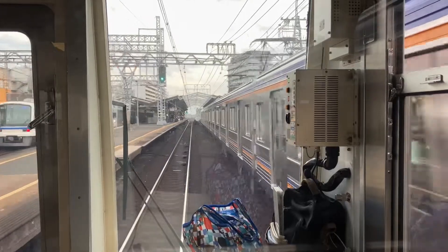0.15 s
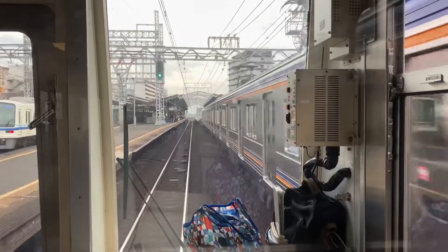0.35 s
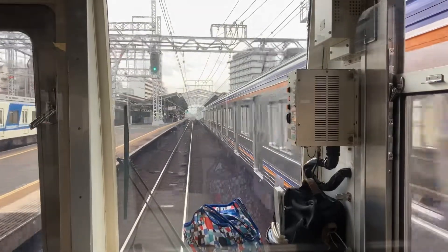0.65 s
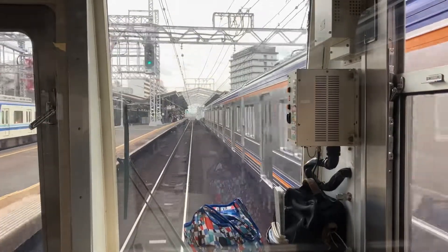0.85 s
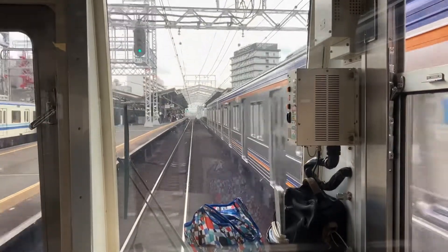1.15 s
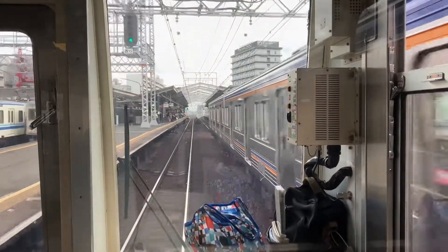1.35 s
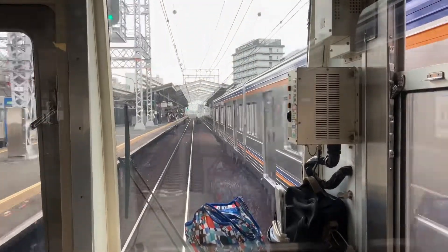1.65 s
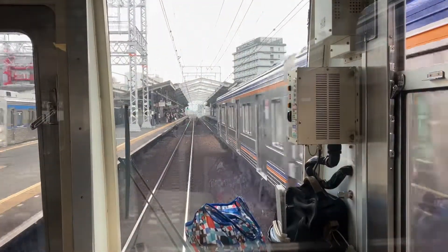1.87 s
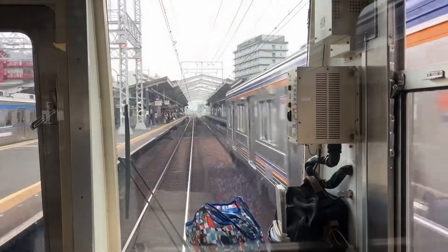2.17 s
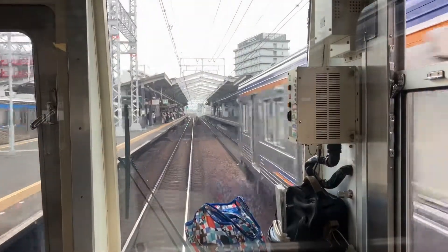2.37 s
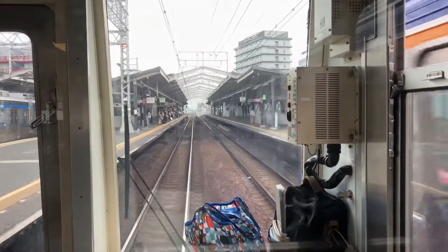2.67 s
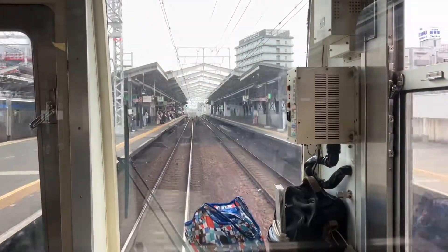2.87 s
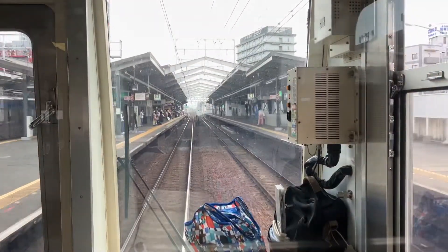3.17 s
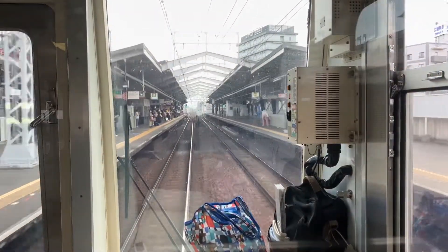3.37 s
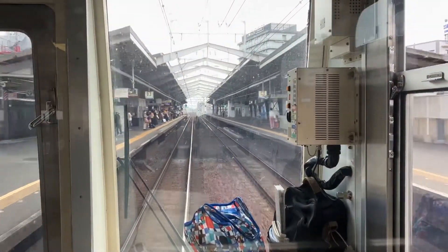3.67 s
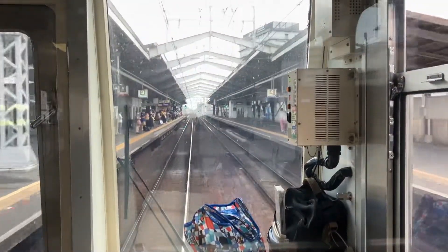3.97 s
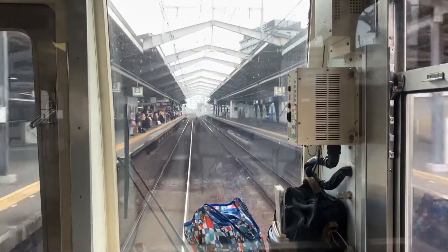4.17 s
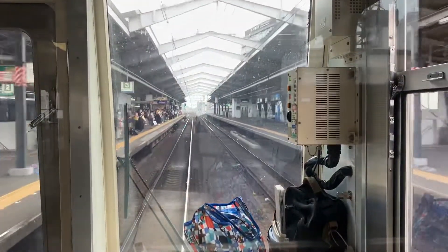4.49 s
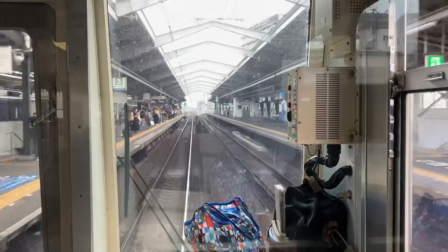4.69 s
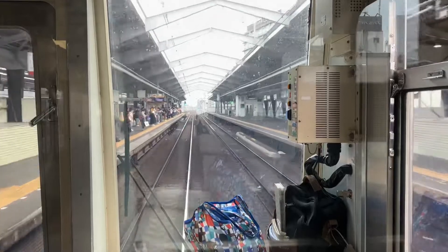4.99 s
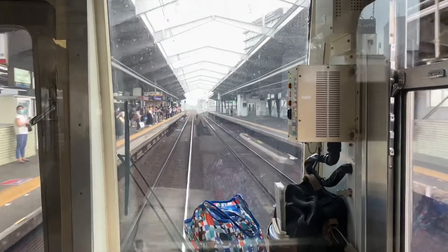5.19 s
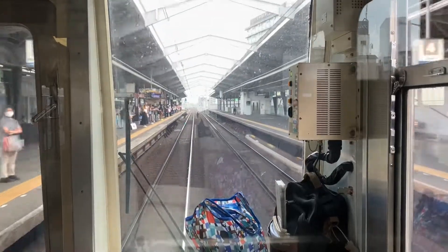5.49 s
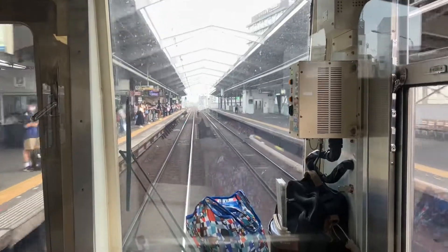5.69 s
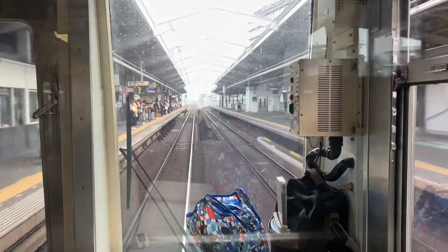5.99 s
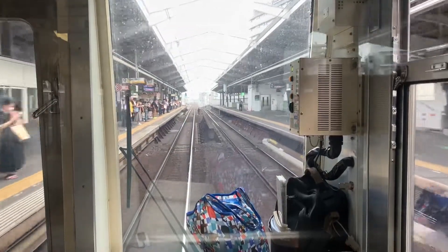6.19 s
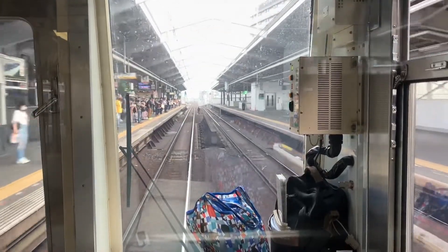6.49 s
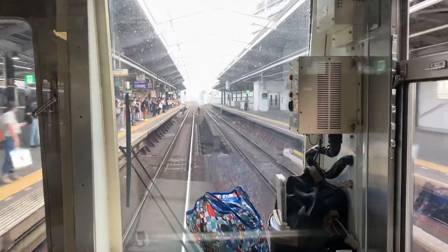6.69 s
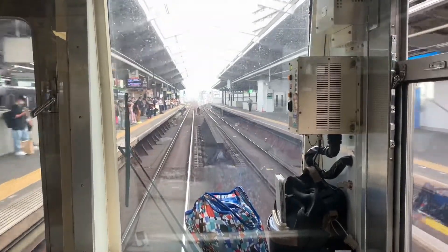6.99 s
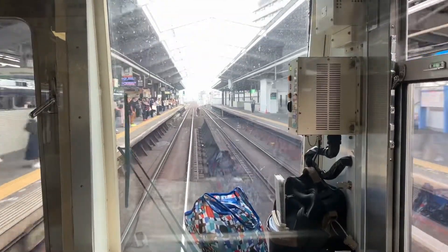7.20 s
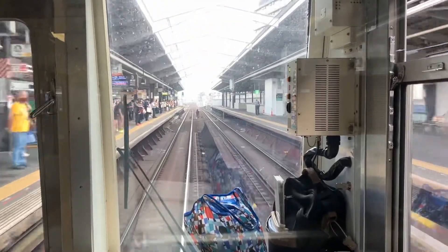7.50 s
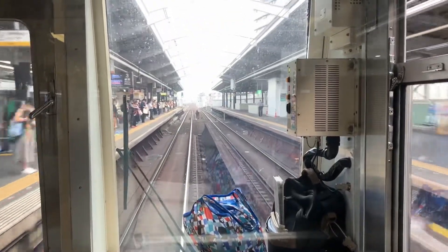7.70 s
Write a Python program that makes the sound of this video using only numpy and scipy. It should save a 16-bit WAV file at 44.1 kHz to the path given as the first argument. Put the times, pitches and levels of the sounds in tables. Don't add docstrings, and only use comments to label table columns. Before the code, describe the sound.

A phone inside a train car picks up boomy floor rumble, low throbbing hum and broad rolling noise as the train coasts into a station. Short metallic rings and soft air puffs flicker through it. A wavering whine goes by, a few light bumps follow, then after a calmer middle the wheels hammer across rail gaps, loose fittings clattering, with thin high squeal from the flanges.

```python
import sys
import numpy as np
from scipy import signal
from scipy.fft import rfft, irfft, next_fast_len
from scipy.io import wavfile
from scipy.ndimage import uniform_filter1d

SR = 44100
rng = np.random.default_rng(int(sys.argv[2]) if len(sys.argv) > 2 else 0)


def persist_wave(psi):
    counts = np.round(np.clip(psi, -1, 1) * 32767).astype(np.int16)
    wavfile.write(sys.argv[1], SR, np.atleast_2d(counts).T)


def rack_gain(trim_db):
    fader = np.asarray(trim_db, float)
    return 10 ** (fader / 20)


N = 346185
SIZE = next_fast_len(N, True)
T = np.arange(N) / SR
HZ = np.maximum(np.fft.rfftfreq(SIZE, 1 / SR), 1)

# pitch_hz, level_db (per Hz)
CAR_COLOUR = [(14, -42), (25, -22), (64, -3.5), (95, -4), (140, -13), (300, -18.5), (770, -30.5),
              (1300, -37), (3000, -45), (5500, -52.5), (8000, -62), (10500, -58), (13500, -68.5),
              (16000, -75)]
# pitch_hz, width_hz, level_db
PANEL_RINGS = [(80, 72, -1), (180, 24, 2), (240, 26, 3.5), (368, 14, 3), (516, 124, 5), (660, 50, -5),
               (776, 52, 7.5), (922, 77, 6.5), (2430, 79, 3.5), (1484, 52, 6), (1821, 130, 5),
               (3230, 120, 5.5), (6650, 740, 3), (7870, 870, 10.5), (15350, 600, 7)]


def level(x, db):
    return x * rack_gain(db) / np.sqrt(np.mean(x ** 2))


def along(table):
    hz, value = np.transpose(table)
    return np.interp(np.log(HZ), np.log(hz), value)


def played(table, fade=.04):
    s, *columns = np.transpose(table)
    gate = np.clip(np.minimum(T - s[0], s[-1] - T) / fade + .5, 0, 1)
    return *(np.interp(T, s, c) for c in columns), gate


def walk(rate):
    k = int(SR / rate)
    held = np.repeat(rng.standard_normal(N // k + 1), k)
    return 1.27 * uniform_filter1d(uniform_filter1d(held, k), k)[:N]


def resonance(hz, centre_hz, width_hz):
    return 1 / (1 + (2 * (hz - centre_hz) / width_hz) ** 2)


def narrow(hz, width_hz, steady=0):
    sos = signal.butter(2, width_hz / 2, fs=SR, output="sos")
    noise = rng.standard_normal((2, len(hz))) + 1j * rng.standard_normal((2, len(hz)))
    pair = signal.sosfilt(sos, noise)
    carrier = np.exp(2j * np.pi * np.cumsum(hz) / SR)
    return level(np.real(pair / abs(pair) ** steady * carrier), 0)


def ports(pair):
    # pitch_hz, likeness (0-1)
    likeness = [(25, .998), (60, .995), (125, .955), (250, .72), (500, .47), (1000, .2), (1300, .18),
                (3000, .1), (4300, .22), (6000, .25), (6900, .82), (8300, .96), (15000, .93)]
    # pitch_hz, lead (radians)
    port_lead = [(0, .1), (800, .1), (1300, 3.1), (1900, 2.1), (3500, 2.2), (4200, 6.2), (4700, 6.3),
                 (5300, 8.8), (5900, 9.9), (6500, 12.7), (6950, 12.57), (16500, -1.3)]
    # pitch_hz, difference_db
    port_lean = [(25, -1.3), (60, -3), (110, -1), (200, -2.5), (380, 1.5), (700, 1), (1290, 0), (2380, 1.5),
                 (4400, 0.5), (8120, -1), (15000, 1)]
    near, other = rfft(pair, SIZE)
    like = np.clip(along(likeness), 0, 1)
    turn = np.exp(-1j * np.interp(HZ, *np.transpose(port_lead)))
    lean = rack_gain(along(port_lean) / 2)
    left = near * lean
    right = (like * turn * near + np.sqrt(1 - like ** 2) * other) / lean
    return irfft([left, right], SIZE)[:, :N]


def hum():
    # time_s, level_db
    load = [(0, -27), (.9, -38), (1.2, -17.5), (1.45, -25.5), (2.0, -18.5), (2.4, -24.5), (2.9, -18.5),
            (3.4, -17.5), (3.9, -13), (4.13, -12), (4.55, -17), (4.78, -15), (5.3, -16.5), (5.9, -14.5),
            (6.62, -18.5), (6.87, -12.5), (7.17, -20.5), (7.85, -16)]
    # multiple of the pitch, level_db
    overtones = [(2, -38.5), (3, -39)]
    # time_s, depth_db
    lurches = [(1.265, 12), (1.57, 29), (1.86, 13), (3.29, 0), (3.535, 20), (3.785, 24), (3.96, 6),
               (4.18, 5), (4.31, 4), (4.58, 2), (4.73, 0.5), (4.91, 18), (5.21, 8), (5.87, 5), (6.15, 10),
               (6.245, 8), (6.5, 0.5), (6.74, 6), (7.75, 9)]
    hum_hz, lurch_s = 87.18, .026
    choke = sum(depth * np.exp(-((T - s) / lurch_s) ** 2) for s, depth in lurches)
    db = played(load)[0] + 1.0 * walk(14) - choke
    phase = 2 * np.pi * np.cumsum(hum_hz + 0.79 * walk(9)) / SR
    wander = np.cumsum(walk(30)) * 18 / SR
    tone = rack_gain(db - 0.5 + 0.62 * walk(20)) * np.sin(phase)
    for multiple, over_db in overtones:
        tone = tone + rack_gain(over_db + 2.1 * walk(8.6)) * np.sin(multiple * (phase + wander))
    return np.sqrt(2) * rack_gain([[-.8], [.8]]) * tone


def rolling():
    # time_s, level_db
    roughness = [(0, 0.5), (.5, 0), (1.3, -0.5), (1.95, 1.5), (2.25, -1), (2.6, 0), (3.25, -1), (3.7, 0),
                 (4.2, -1), (4.5, -0.5), (5.1, -2), (5.25, -3), (5.38, -2.5), (5.5, 2), (6.1, 1),
                 (6.45, -1), (6.8, -1.5), (7.6, -0.5), (7.85, -1)]
    layer_hz = [70, 260, 1200, 5500]
    layer_shares = [0.27, 1.28, 0.65, 0.29]
    # time_s, length_s, rise_db
    puffs = [
        (0.148, 0.33, 0),
        (.47, .15, 0.5),
        (1.152, 0.4, 1.5),
        (2.003, 0.11, 3),
        (2.33, 0.25, 3.5),
        (3.75, 0.19, 2),
        (4.27, .1, 2),
        (5.479, 0.056, 2.5),
        (7.098, 0.2, 2),
    ]
    top_calm = .35
    panel_db = sum(db * resonance(HZ, hz, width) for hz, width, db in PANEL_RINGS)
    colour = rack_gain(along(CAR_COLOUR) + panel_db)
    pair = colour * rfft(rng.standard_normal((2, SIZE)))
    rise = np.outer(layer_shares, played(roughness)[0]) + [db * walk(6) for db in (1.1, .6, .3, .2)]
    rise[3] += sum(db * np.exp(-(2 * (T - s) / length) ** 2) for s, length, db in puffs)
    out, place, shared = 0, 2 * np.log2(HZ / 20), walk(4.7)
    for k in range(20):
        share = np.interp(np.log(20 * 2 ** (k / 2)), np.log(layer_hz), range(4))
        weights = np.clip(1 - abs(share - np.arange(4)), 0, 1)
        shared = 0.93 * shared + 0.32 * walk(9)
        db = weights @ rise + 0.5 * shared + 1.0 * walk(22)
        db = db * (top_calm if k == 19 else 1)
        band = np.clip(1 - abs(place - k), 0, 1)
        out = out + rack_gain(db) * irfft(pair * band, SIZE)[:, :N]
    return level(out, -23)


def whistles():
    # start_s, length_s,
    # pitch_hz, width_hz, level_db
    short_rings = [(.055, .135, 1930, 30, -46.5), (.19, .06, 1810, 70, -47), (.265, .035, 1790, 60, -46),
                   (.195, .025, 2490, 60, -52), (.44, .07, 1800, 70, -50), (.57, .08, 1900, 160, -47),
                   (.66, .14, 1850, 160, -48), (1.02, .18, 1800, 160, -49), (1.78, .1, 1800, 120, -51),
                   (1.98, .1, 1800, 200, -50), (2.925, .095, 1840, 20, -46), (3.05, .06, 1790, 30, -48),
                   (3.15, .1, 1820, 30, -49), (3.19, .11, 2350, 600, -49), (3.07, .12, 635, 25, -37.5),
                   (3.74, .16, 243, 6, -27), (.98, .16, 190, 20, -31), (1.04, .1, 268, 15, -32),
                   (6.62, .12, 185, 20, -29), (7.08, .2, 270, 30, -33), (2.25, .24, 5900, 1800, -57),
                   (7.02, .12, 5900, 2000, -58),
                   (0, .6, 74, 5, -26), (.3, .7, 94, 6, -29), (6.9, .9, 120, 4, -34),
                   (1.84, .2, 112, 14, -25), (5.4, .35, 125, 40, -27), (7.3, .4, 195, 40, -29.5),
                   (5.03, .16, 180, 25, -31), (4.1, .12, 800, 80, -42), (5.425, .07, 830, 50, -39),
                   (3.24, .14, 300, 120, -34), (.02, .25, 140, 40, -31), (5.66, .07, 860, 150, -40),
                   (2.7, .35, 1900, 900, -52), (4.15, .17, 3200, 60, -59), (0, .35, 1950, 250, -52),
                   (.5, .32, 1870, 200, -53), (6.37, .07, 205, 15, -22), (5.8, .07, 280, 25, -26),
                   (3.8, .22, 3150, 100, -59), (2.3, .13, 6200, 500, -59), (3.18, .08, 1880, 120, -50),
                   (1.9, .16, 165, 30, -30), (6.36, .12, 195, 20, -26)]
    fan_hz, fan_db = 1128, -56
    out = rack_gain(fan_db) * narrow(np.full(N, 1. * fan_hz), 5.1)
    for s, length, hz, width_hz, db in short_rings:
        place = np.linspace(-1, 1, int(length * SR))
        settled = narrow(np.full(len(place) + SR // 5, 1. * hz), width_hz, steady=0.85)
        ring = settled[:, -len(place):]
        i = int(s * SR)
        out[:, i:i + len(place)] += level(ring * (1 - place ** 4), db)
    return out


def streaks():
    count, streak_db, mean_s = 120, -1, .07
    out = np.zeros((2, N + SR))
    centres, car = np.array(PANEL_RINGS)[4:12], np.array(CAR_COLOUR)
    for when, which, off, drift, long, turn in rng.random((count, 6)):
        centre_hz, _, panel_db = centres[int(which * len(centres))]
        hz = centre_hz * (.93 + .14 * off)
        t = T[:int(mean_s * (.5 + long) * SR)]
        glide = 1 + 0.26 * (drift - .6) * t
        phase = 2 * np.pi * (hz * t * glide + turn * np.array([[0], [1]]))
        car_db = np.interp(np.log(hz), np.log(car[:, 0]), car[:, 1])
        db = car_db - 14 + panel_db + streak_db
        i = int(when * N)
        out[:, i:i + len(t)] += rack_gain(db) * np.sin(phase) * np.sin(np.pi * t / t[-1])
    return out[:, :N]


def gaps():
    # time_s, peak_db, low_ring_hz, high_ring_hz, clank_db
    gap_hits = [(0.097, -27.5, 174, 255, -14), (1.786, -20, 167.1, 282, -21), (1.871, -21.5, 220, 295, -24),
                (1.991, -15.5, 168.5, 255, -20), (5.44, -7.5, 194.5, 275.3, -18.5),
                (5.612, -8, 205, 261.3, -18), (5.66, -18, 240, 260, -11), (5.806, -10.5, 169, 291, -18.5),
                (5.999, -12.5, 166, 267, -16), (6.164, -4, 228.5, 284.7, -23),
                (6.224, -17.5, 190, 300, -14), (6.352, -6, 190.3, 280.4, -23.5),
                (6.384, -9, 170.5, 283.4, -21), (6.625, -17, 191.6, 252, -21),
                (6.819, -15.5, 222, 261, -21), (7.685, -17.5, 180, 254, -21)]
    # pitch_hz, width_hz, level_db
    bogie_rumble = [(125, 40, -3), (235, 140, 0), (460, 200, -18)]
    # time_s, peak_db, pitch_hz
    fitting_ticks = [
        (3.2645, -28, 480),
        (6.178, -26, 700),
    ]
    high_ring_db = -0.5
    crack, crack_s = 0.62, 0.016
    out, t = np.zeros((2, 2, N + SR)), T[:8192]
    hz = np.maximum(np.fft.rfftfreq(len(t), 1 / SR), 1)
    bogie = sum(rack_gain(db) * resonance(hz, f, w) ** 2 for f, w, db in bogie_rumble)
    envelope = (1 - np.exp(-t / 0.0057)) * np.exp(-(t / 0.058) ** 2)
    for s, peak_db, low_hz, high_hz, clank_db in gap_hits:
        shake = rfft(rng.standard_normal((2, len(t))) + 1.3 * rng.standard_normal(len(t)))
        turn = rng.random() + 0.095 * rng.standard_normal((2, 2, 1))
        low_ring = np.sin(2 * np.pi * (low_hz * t + turn[0]))
        high_ring = np.sin(2 * np.pi * (high_hz * t + turn[1]))
        rings = low_ring + rack_gain(high_ring_db) * high_ring
        rumble = level(irfft(shake * bogie), -9.5)
        clank = level(irfft(shake * resonance(hz, 830, 240) ** 2), clank_db - 5.5)
        body = rack_gain(-8.5) * rings + rumble + clank
        grit_noise = rfft(rng.standard_normal((2, len(t))))
        grit = level(irfft(grit_noise * resonance(hz, 1800, 3800) ** 2), clank_db - 13.5)
        grit = grit * (1 + crack * np.exp(-t / crack_s))
        hit = np.array([body * rack_gain([[-.8], [.8]]), grit]) * envelope
        i = int(s * SR)
        out[..., i:i + len(t)] += rack_gain(peak_db) * hit
    for s, peak_db, tick_hz in fitting_ticks:
        tick = np.sin(2 * np.pi * tick_hz * t) + .03 * rng.standard_normal((2, len(t)))
        i = int(s * SR)
        out[1, :, i:i + len(t)] += rack_gain(peak_db - 3) * tick * np.exp(-t / .004)
    return out[..., :N]


def wiper():
    # length_s, ring_from_hz, ring_to_hz, level_db
    creaks = [
        (.165, 4200, 3200, -56.5),
        (.08, 3650, 3350, -61.5),
    ]
    first_s, sweep_s, stroke_s = .17, 2.122, .888
    chatter_hz = 291.5
    out, rough = np.zeros((2, N + SR)), rack_gain(3 * walk(60))
    for sweep in range(4):
        for k, (length, from_hz, to_hz, db) in enumerate(creaks):
            t = T[:int(length * SR)]
            hz = chatter_hz * (1 + 0.0011 * rng.standard_normal()) * np.arange(10, 16)[:, None]
            ring = to_hz + (from_hz - to_hz) * (1 - t / length) ** 1.9
            turn = rng.random((6, 1)) + .15 * rng.standard_normal((2, 6, 1))
            strength = resonance(hz, ring, 380) + .15 * resonance(hz, 3230, 200)
            lines = np.sin(2 * np.pi * (hz * t + turn)) * strength
            i = int((first_s + sweep * sweep_s + k * stroke_s - .048) * SR)
            swell = np.sqrt(np.sin(np.pi * t / length)) * rough[i:i + len(t)]
            creak = level(lines.sum(axis=1) * swell, db)
            out[:, i:i + len(t)] += creak * rack_gain([[1.5], [-1.5]])
    return out[:, :N]


def passing():
    # time_s, pitch_hz, level_db
    gear_whine = [(.6, 366, -46), (.7, 358, -32.5), (.76, 350, -33.5), (.82, 348.4, -26), (.93, 351.3, -36),
                  (.99, 360, -30.5), (1.1, 358, -37.5), (1.19, 360, -32), (1.26, 360.2, -44),
                  (1.31, 362, -27), (1.39, 363, -33), (1.47, 360.8, -37), (1.57, 361, -39.5),
                  (1.63, 359, -32), (1.74, 368, -37.5), (1.87, 382, -36.5), (2.05, 374.6, -33),
                  (2.2, 378, -45)]
    hz, db, gate = played(gear_whine, fade=.08)
    out, on = np.zeros((2, N)), gate > 0
    tone = narrow(hz[on], 15, steady=0.72)[0]
    neighbour = rack_gain(-8) * narrow(1.07 * hz[on], 22.0)
    out[:, on] += (tone + neighbour) * (rack_gain(db + 1.0) * gate)[on]
    return out


def flanges():
    # start_s, length_s, first_hz, first_db, last_db
    songs = [
        (4.121, 1.5, 7870, -52.5, -52.5),
        (4.249, 1.62, 7040, -62.5, -51.5),
        (7.0, .7, 8130, -62, -64.5),
        (7.0, .2, 6520, -61, -62),
        (7.332, .27, 6740, -62, -64),
        (7.02, .6, 7680, -62, -66),
    ]
    # width_hz, octave_db
    song_bands = [(210, -22), (340, -34.5), (250, -33), (600, -35), (250, -33), (300, -35)]
    sag_per_s, fade_s = .028, .3
    out = np.zeros((2, N))
    for (s, length, first_hz, first_db, last_db), (width_hz, octave_db) in zip(songs, song_bands):
        last_hz = first_hz * (1 - sag_per_s * length)
        curve = [(s, first_hz, first_db), (s + length, last_hz, last_db)]
        hz, db, gate = played(curve, fade=min(fade_s, length / 4))
        on = gate > 0
        song = narrow(hz[on], width_hz, steady=0.13)
        song = song + rack_gain(octave_db) * narrow(2 * hz[on], 2 * width_hz)
        flicker_db = 1.5 * walk(9) + 0.52 * walk(25)
        out[:, on] += song * (rack_gain(db + 2.5 + flicker_db) * gate)[on]
    return out


def rattles():
    # time_s, level_db, length_s
    bursts = [
        (5.47, -34.5, 0.046),
        (5.527, -40, 0.036),
        (5.682, -34.5, 0.054),
        (5.714, -37.5, .04),
        (5.86, -39, 0.049),
        (6.01, -32, 0.042),
        (6.06, -40, .04),
        (6.271, -45, .04),
        (6.41, -40.5, 0.036),
    ]
    # pitch_hz, width_hz, level_db
    frame_rings = [(500, 96, 2), (870, 180, 0), (1120, 150, -4), (1500, 120, -4), (1820, 140, -6),
                   (2500, 300, -24), (3300, 200, -23), (4300, 1600, -19)]
    out, t = np.zeros((2, N)), T[:8192]
    hz = np.fft.rfftfreq(len(t), 1 / SR)
    colour = sum(rack_gain(db) * resonance(hz, f, width) for f, width, db in frame_rings)
    for s, burst_db, length in bursts:
        noise = rfft(rng.standard_normal((2, len(t))))
        burst = level(irfft(colour * noise), burst_db)
        i = int(s * SR)
        out[:, i:i + len(t)] += burst * (1 - np.exp(-t / 0.0033)) * np.exp(-(t / length) ** 2)
    return out


def scene():
    thuds, grit = gaps()
    direct = hum() + thuds + passing() + wiper() + streaks()
    through_car = rolling() + grit + rattles() + flanges() + whistles()
    return direct + ports(through_car)


def low_pass(x):
    return signal.sosfilt(signal.butter(12, 15760, fs=SR, output="sos"), x)


def record(dry):
    mix = 0.88 * np.tanh(dry / 0.92)
    return low_pass(mix)


dry = scene()
out = record(dry)
persist_wave(out)
```